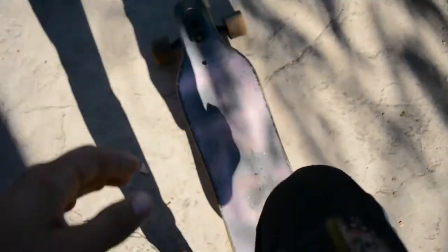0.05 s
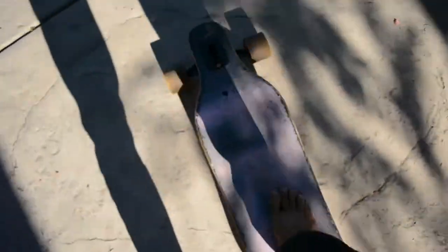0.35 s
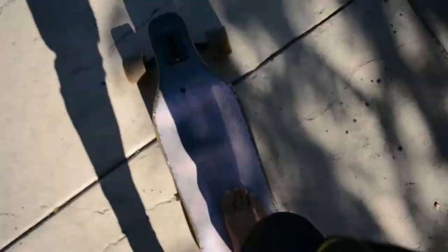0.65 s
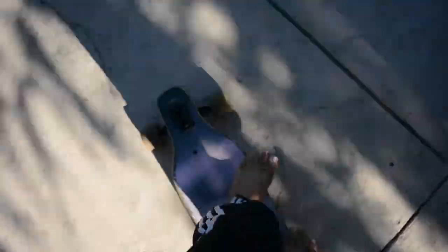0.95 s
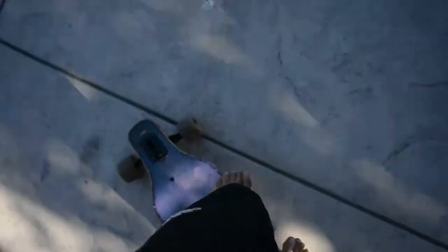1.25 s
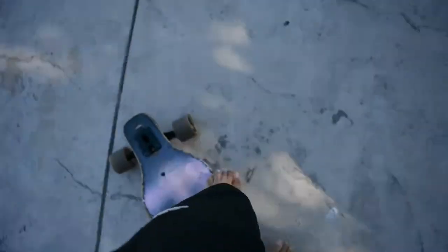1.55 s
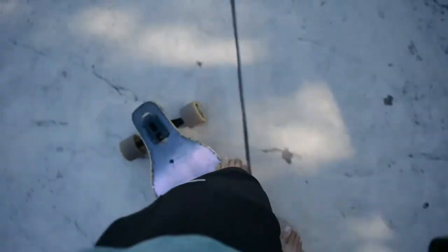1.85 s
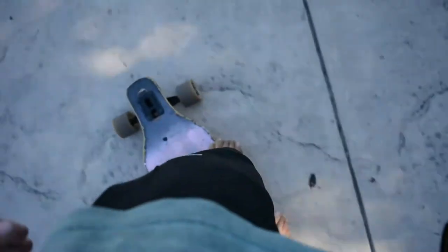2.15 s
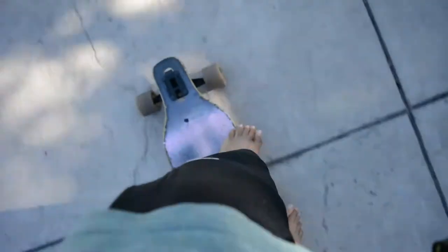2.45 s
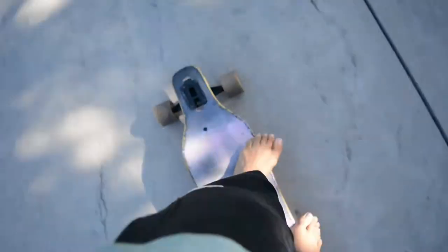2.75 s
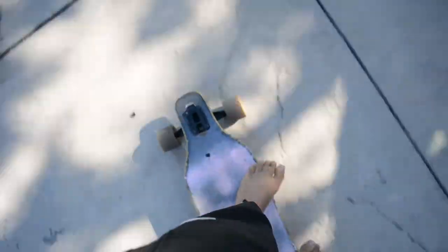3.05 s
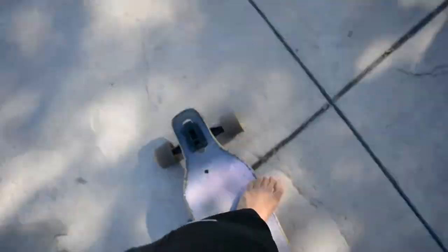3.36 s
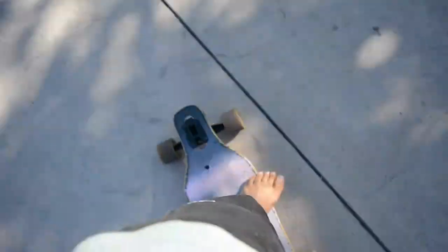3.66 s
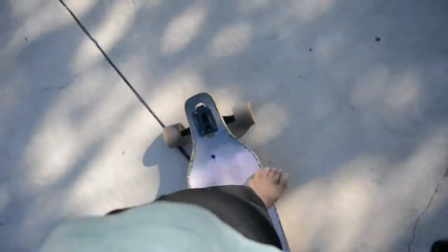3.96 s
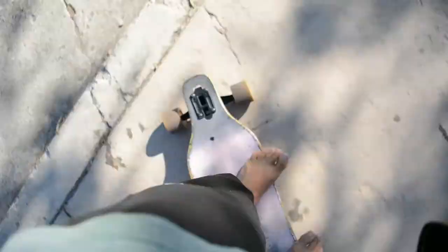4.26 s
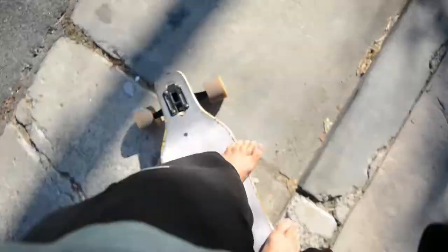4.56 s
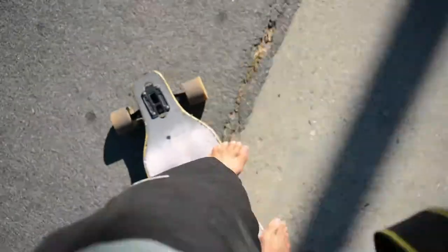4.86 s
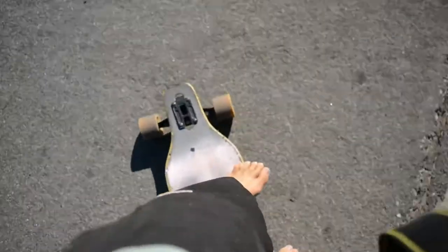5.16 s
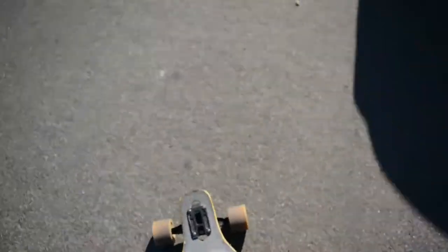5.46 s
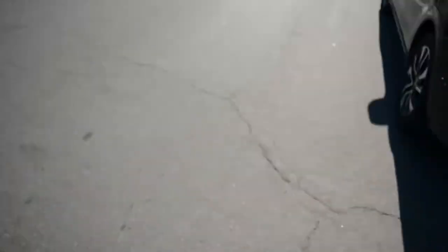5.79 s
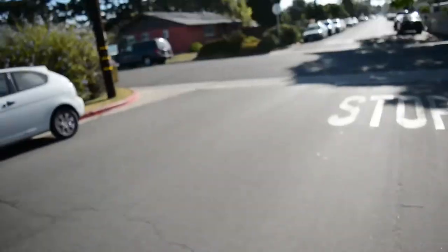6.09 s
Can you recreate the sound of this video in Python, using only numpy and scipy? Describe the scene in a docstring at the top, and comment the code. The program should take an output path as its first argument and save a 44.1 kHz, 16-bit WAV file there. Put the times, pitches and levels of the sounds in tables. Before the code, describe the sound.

A skateboard lands with a loud clack and rattle, then its wheels rumble over sidewalk cracks, clattering across a rough patch before fading.

```python
"""A loud wooden slam and clatter: a longboard is dropped on concrete, then ridden over sidewalk slabs,
across a broken gutter and onto asphalt. Impacts excite the deck's resonant modes, and the pavement's
texture drums it through the wheels. Joints knock, grit crackles and bearings sizzle, over a weak echo
and faint street air. The landing overloads a hand-held microphone; as it tilts away, the rolling fades."""
import sys
import numpy as np
from scipy import signal
from scipy.fft import rfft, irfft, next_fast_len
from scipy.io import wavfile
from scipy.ndimage import map_coordinates

SR = 44100
rng = np.random.default_rng(int(sys.argv[2]) if len(sys.argv) > 2 else 0)


def store_pcm(level_fs):
    """Save levels as 16-bit WAV."""
    pcm = np.round(np.clip(level_fs, -1, 1) * 32767).astype(np.int16)
    wavfile.write(sys.argv[1], SR, np.atleast_2d(pcm).T)


N = 274610
TAPS = 8192  # samples in one filter or impact
HZ = np.fft.rfftfreq(TAPS, 1 / SR)
AGE = np.arange(TAPS) / SR  # seconds since an impact


# modes of the unloaded board: pitch_hz, width_hz, level_db
FREE_MODES = [(315, 115, -4.5), (385, 54, -8.5), (565.3, 26.4, 4.5), (610, 42, -4), (680, 130, -8.5),
              (855, 24, -9), (1110, 80, -15), (1405, 99, -36), (1575, 340, -16), (1743, 104, -15),
              (2016, 40, -20), (2262, 100, -21), (2670, 300, -34)]
# the slam and its rebounds: start_s, blow_db, crack_db, contact_s
LANDING_HITS = [(.1055, 17, -9.5, 0.0012), (.171, -7, -26, 0.0095), (.2075, -2.5, -17.5, 0.00062),
                (.2425, -2.5, -18.5, 0.0045), (.256, -6, -27, 0.0022), (.2888, 6.5, -15.5, 0.002),
                (.307, -11, -20.5, 0.0024), (.333, -6.5, -32, 0.003), (.349, -33, -27, 0.0015),
                (.368, -13, -42, 0.0027)]
def landing():
    """Free vibration: with little weight on it, the board rings at each rebound."""
    out = np.zeros(N)
    for start_s, blow_db, crack_db, contact_s in LANDING_HITS:
        body = deck(FREE_MODES, scatter_db=1.3)
        add(out, start_s, amp(blow_db) * blow(body, contact_s, scrape=0.22, scrape_s=0.0032, low_hz=186))
        add(out, start_s, amp(crack_db) * crack(rise_s=0.0042, t60=0.14, tail_db=-2.5, tail_t60=0.22))
    return out


def deck(modes, scatter_db):
    """Modal superposition: damped resonances of random strength add in power to one gain curve."""
    gains = [amp(db + scatter_db * rng.normal()) * hz * width / (hz ** 2 - HZ ** 2 + 1j * HZ * width)
             for hz, width, db in modes]
    return np.sqrt(sum(np.abs(gain) ** 2 for gain in gains))


def blow(body, contact_s, scrape, scrape_s, low_hz):
    """Impact excitation: an impulse and a scrape ring the deck; soft wheels slow the onset."""
    force = rng.standard_normal(TAPS) * AGE * np.exp(-AGE / scrape_s)
    force *= scrape / np.linalg.norm(force)
    force[0] += 1
    ring = filtered(force, body) * onset(max(contact_s, 1e-4))
    return unit_peak(filtered(ring, low_cut(low_hz)))


def low_cut(cutoff_hz):
    """High-pass: thins the bass of the knocks and the drumming."""
    return HZ ** 2 / np.sqrt(HZ ** 4 + cutoff_hz ** 4)


# spectrum of a hard contact: frequency_hz, level_db
CRACK_SPECTRUM = [(100, -35), (900, 13), (1900, 5), (2700, 6), (3800, -2.5), (6500, -5.5), (8400, -1),
                  (10500, -16.5), (13500, -13), (16000, -15)]
def crack(rise_s, t60, tail_db, tail_t60):
    """Broadband transient: the contact crunches, and the trucks rattle on after it."""
    crunch = (burst(t60) + amp(tail_db) * burst(tail_t60)) * onset(rise_s)
    return unit_peak(filtered(crunch, colour(CRACK_SPECTRUM)))


# modes of the board under the rider's weight: pitch_hz, width_hz, level_db
LOADED_MODES = [(335, 87, -6), (477, 35, -4), (537.7, 45, 4), (595, 51, 3.5), (643, 48, 1.5),
                (693.3, 44, 1.5), (765, 31, -8.5), (1098, 136, -10), (1180, 220, -24.5), (1590, 140, -50),
                (2133, 150, -21.5), (2500, 230, -34.5)]
# wheels strike slab edges, at relative levels: start_s, blow_db, crack_db
JOINT_HITS = [(.483, -18, -37), (.492, -19, -32), (.883, -20.5, -57), (.98, -18.5, -30),
              (1.058, -13, -33.5), (1.081, -15, -35), (1.091, -10, -25), (1.377, -21.5, -36),
              (1.551, -23, -34.5), (1.572, -18.5, -32), (1.7, -24.5, -42), (1.912, -21, -32.5),
              (2.236, -21, -35), (2.41, -11, -38), (2.51, -17.5, -44), (2.712, -13.5, -40),
              (2.981, -19.5, -36), (3.079, -24, -52), (3.15, -21.5, -45), (3.184, -23.5, -55),
              (3.338, -19.5, -39), (3.363, -17, -38), (3.475, -23, -40), (3.664, -16, -47),
              (4.092, -19, -34), (4.285, -14.5, -41), (4.357, -21, -40), (4.43, -5.5, -21),
              (4.444, -11, -18), (4.451, -5.5, -27), (4.458, -2, -28), (4.472, -15, -29), (4.49, -6, -20.5),
              (4.511, -5, -19), (4.635, -21.5, -33), (4.696, -20, -31), (4.717, -11.5, -21.5),
              (4.744, -7, -33), (4.75, -12, -24), (4.761, -11, -34), (4.79, -12, -40), (4.833, -19, -27.5),
              (4.854, -20.5, -37), (4.913, -21, -30.5), (4.936, -16.5, -33.5), (4.949, -15, -44),
              (5.139, -19.5, -38), (5.221, -23, -55)]
def joints():
    """Contact stiffening: a harder knock is briefer, and jolts more of the rider's weight off the deck."""
    out = np.zeros(N)
    bounce_rise_s = 0.0079
    for start_s, blow_db, crack_db in JOINT_HITS:
        softness = amp(-0.35 * blow_db)
        free_share = min(amp(blow_db - 3), 1)
        loaded, free = deck(LOADED_MODES, scatter_db=2.5), deck(FREE_MODES, scatter_db=2.0)
        body = np.sqrt((1 - free_share) * loaded ** 2 + free_share * free ** 2)
        knock = blow(body, contact_s=0.0026 * softness, scrape=0.3, scrape_s=0.0034, low_hz=152)
        crunch = crack(rise_s=0.0017 * softness, t60=0.022, tail_db=-12.5, tail_t60=0.082)
        ripple_hz = np.interp(start_s, *np.transpose(RIPPLE_RATE))
        thump = wheel_bounce(ripple_hz, bounce_rise_s, t60=0.066)
        add(out, start_s, amp(blow_db + 1.5) * knock)
        add(out, start_s - 0.001, amp(crack_db + 6) * crunch)
        add(out, start_s - bounce_rise_s, amp(0.37 * blow_db - 26) * thump)
    return out


def wheel_bounce(pitch_hz, rise_s, t60):
    """Damped oscillator: a wheel thumps on its springy urethane."""
    swing = np.sin(2 * np.pi * (pitch_hz * AGE + rng.random()))
    return unit_peak(swing * onset(rise_s) * amp(-60 * AGE / t60))


# stones and steel fittings: start_s, peak_db, pitch_hz
SNAP_HITS = [(0.1031, -11, 4600), (0.1046, -4, 8500), (0.108, 4.5, 7760), (.156, -16, 1890),
             (0.171, -24, 2100), (0.209, -9.5, 2000), (.234, -15, 2880), (.313, -23, 1980),
             (.936, -26, 2230), (2.855, -29, 2200), (4.283, -25.5, 2440), (4.4271, -16.5, 2570),
             (4.444, -16.5, 2930), (4.456, -19, 1450), (4.495, -18, 7500), (4.509, -12, 7900),
             (4.723, -20, 1770), (4.786, -16, 6860), (4.79, -16.5, 10800), (4.821, -22, 2400),
             (4.842, -22, 3520), (5.064, -30, 3430), (5.3058, -28, 5030), (5.512, -26, 9770),
             (5.678, -31.5, 7510)]
def snaps(ticks_per_s=6.7, tick_hz=4630):
    """Small hard bodies ring high: stones and fittings snap, and sand ticks as a Poisson process."""
    out = np.zeros(N)
    for start_s, peak_db, pitch_hz in SNAP_HITS:
        add(out, start_s, amp(peak_db) * snap(pitch_hz))
    _, _, grit_db = contact_levels()
    for i in np.flatnonzero(rng.random(N) < ticks_per_s / SR):
        peak_db = grit_db[i] + 9 + rng.normal()
        octaves = 0.6 * rng.normal()
        add(out, i / SR, amp(peak_db) * snap(tick_hz * 2 ** octaves))
    return out


def snap(pitch_hz, q=3.0):
    """Heavily damped resonance: a brief noise burst clicks around one pitch."""
    resonance = 1 / np.sqrt(1 + (q * (HZ / pitch_hz - pitch_hz / (HZ + 1))) ** 2)
    return unit_peak(filtered(burst(0.0059) + amp(5.5) * burst(0.013), resonance))


def rolling():
    """Forced vibration: pavement texture drives deck and wheels; rough patches also crush more grit."""
    drum_db, rumble_db, grit_db = contact_levels()
    patches = wobble(60) + 0.4 * wobble(18)
    texture = bumps(per_s=1800, spread_db=7)
    body = deck(LOADED_MODES, scatter_db=0) * low_cut(cutoff_hz=170)
    drum = amp(drum_db + 1 + 1.7 * patches) * unit_rms(filtered(texture, body))
    grains = 0.23 * texture + rng.standard_normal(N) + 0.81 * bumps(per_s=340, spread_db=11)
    sizzle = amp(grit_db + 1.64 * patches) * (grit(grains) + amp(-10) * bearings())
    wheels = amp(rumble_db - 0.5 + 2.3 * patches) * rumble()
    return drum + wheels + sizzle


# relative levels of steady rolling: time_s, drum_db, rumble_db, grit_db
ROLL_LEVELS = [(0.4, -29, -41.5, -41.5), (0.68, -42.5, -43, -57), (0.9, -36.5, -50, -53.5),
               (1.08, -40.5, -39, -50.5), (1.28, -35, -44.5, -49), (1.52, -34.5, -40.5, -47.5),
               (2.36, -33, -37, -48), (2.8, -34, -41, -49), (3.06, -35, -47.5, -52),
               (3.32, -36, -39.5, -50), (3.55, -34.5, -44, -50), (3.92, -33.5, -47, -50),
               (4.2, -33.5, -47.5, -48), (4.5, -36, -33, -53), (4.67, -33, -36.5, -43),
               (4.94, -31, -39.5, -46.5), (6.06, -40.5, -51, -56.5), (6.23, -42.5, -57, -60.5)]
# brief swells from foot scuffs, landing clatter, shudder after joints and rough ground:
# start_s, length_s, extra_drum_db, extra_rumble_db, extra_grit_db
SWELLS = [(0.007, 0.016, 4, 7, 5.5), (0.152, .11, 19, 16, -3), (0.312, 0.046, 23, 19, 10),
          (0.482, 0.052, 4, -5, 1.5), (0.612, .06, 5.5, 5.5, 9.5), (0.971, 0.058, 1.5, 5, 11),
          (1.075, 0.015, 10, 6, 10), (2.393, 0.0094, 0.5, 6, 3.5), (2.69, 0.029, 2, 10, 2.5),
          (2.885, 0.25, 0.5, 8.5, 2), (4.29, .12, 1.5, 4, 4), (4.438, 0.082, 12.5, 0.5, 9),
          (4.712, 0.043, 15, 3, 7), (5.088, 0.077, 1.5, 6, 0.5)]
def contact_levels(settled_s=0.48, settling_s=0.025, ramp_s=0.033):
    """Amplitude envelopes in dB: drumming, rumble and grit rise as the wheels settle, with brief swells."""
    t = np.arange(N) / SR
    unsettled = np.clip((settled_s - t) / settling_s, 0, 1)
    levels_db = np.array(curves(ROLL_LEVELS)) - 12.5 * unsettled
    for start_s, length_s, *extra_db in SWELLS:
        inside = 1 + np.minimum(t - start_s, start_s + length_s - t) / ramp_s
        levels_db += np.outer(extra_db, np.clip(inside, 0, 1))
    return levels_db


# rate at which the wheels meet the pavement's ripples: time_s, rate_hz
RIPPLE_RATE = [(.65, 117.9), (1.1, 170), (1.5, 100), (2.15, 98.9), (2.41, 144.5), (2.72, 141.9),
               (3.2, 114.4), (3.45, 199), (4.28, 193.5), (4.5, 147.7), (5.5, 128), (6.23, 144)]
# spectrum of the bouncing wheels: frequency_hz, level_db
RUMBLE_SPECTRUM = [(25, -22), (50, -22), (70, -20), (90, -1.5), (135, -4.5), (190, -3), (260, -11),
                   (500, -18), (1500, -100)]
def rumble():
    """Base excitation: random bumps make the wheels rumble, and ripples add a loose hum."""
    ripple_hz, = curves(RIPPLE_RATE)
    phase = 2 * np.pi * np.cumsum(ripple_hz) / SR
    hum = unit_rms(wobble(22) * np.sin(phase) + wobble(22) * np.cos(phase))
    jolts = unit_rms(filtered(bumps(per_s=990, spread_db=5.5), colour(RUMBLE_SPECTRUM)))
    return unit_rms(jolts + amp(-2.5) * hum)


# spectrum of crushed grit: frequency_hz, level_db
GRIT_SPECTRUM = [(600, -40), (1200, 14.5), (1800, 8), (2700, 8), (3400, 1.5), (4500, -1.5), (5600, -3.5),
                 (7000, -6), (8400, 0), (9800, -11), (11500, -12), (13700, -5.5), (15500, -21)]
def grit(grains):
    """Shot noise: many tiny contacts merge into a bright crackle."""
    return unit_rms(filtered(grains, colour(GRIT_SPECTRUM)))


# resonances of the steel balls and races: pitch_hz, width_hz, level_db
BEARING_MODES = [(5600, 2000, 3), (8170, 1040, -0.5), (13400, 1300, -14)]
def bearings():
    """Amplitude modulation: each resonance chirps in its own short fits, and all swell together."""
    chirps = np.zeros(N)
    for pitch_hz, width_hz, level_db in BEARING_MODES:
        fits = amp(15 * np.tanh(0.54 * wobble(80)))
        band = 1 / (1 + (2 * (HZ - pitch_hz) / width_hz) ** 2)
        chirps += amp(level_db) * unit_rms(fits * filtered(rng.standard_normal(N), band))
    swell_db = 2.5 * np.tanh(wobble(6))
    return unit_rms(chirps * amp(swell_db))


def walls(x, t60, rise_s, cutoff_hz=6000):
    """Diffuse reflection: house fronts scatter a dull echo."""
    t = np.arange(SR // 2) / SR
    reflections = rng.standard_normal(len(t)) * amp(-60 * t / t60) * np.clip(t / rise_s, 0, 1)
    tail = filtered(reflections, 1 / np.hypot(1, HZ / cutoff_hz))
    return signal.fftconvolve(x, tail / np.linalg.norm(tail))[:N]


# spectrum of the open air: frequency_hz, level_db
STREET_SPECTRUM = [(20, 2), (60, -11.5), (200, -1), (1000, -14.5), (4000, -33.5), (15000, -35.5)]
def street():
    """Ambient noise: a faint, steady, low wash."""
    return amp(-53) * unit_rms(filtered(rng.standard_normal(N), colour(STREET_SPECTRUM)))


def amp(db):
    """Decibels to gain."""
    return 10 ** (np.asarray(db) / 20)


def unit_rms(x):
    """Scale to rms 1."""
    return x / np.sqrt(np.mean(x ** 2) + 1e-20)


def unit_peak(x):
    """Scale to peak 1."""
    return x / np.max(np.abs(x))


def colour(points):
    """Spectral envelope: gain interpolated on a log frequency axis."""
    hz, db = np.transpose(points)
    return amp(np.interp(np.log(HZ + 1), np.log(hz), db))


def filtered(x, gain):
    """Minimum-phase filtering: a causal response with this gain per frequency."""
    cepstrum = irfft(np.log(np.maximum(gain, 1e-6)))
    cepstrum[1:TAPS // 2] *= 2
    cepstrum[TAPS // 2 + 1:] = 0
    response = irfft(np.exp(rfft(cepstrum)))
    return signal.fftconvolve(x, response)[:len(x)]


def curves(rows):
    """Linear interpolation: one value per sample for each column after the time."""
    times, *columns = np.transpose(rows)
    return [np.interp(np.arange(N) / SR, times, column) for column in columns]


def wobble(per_s):
    """Smooth noise: a spline through evenly spaced random knots."""
    knots = rng.standard_normal(int(N * per_s / SR) + 4)
    return map_coordinates(knots, [np.arange(N) * per_s / SR])


def bumps(per_s, spread_db):
    """Poisson impulses: tiny contacts of random size and sign."""
    hit = rng.random(N) < per_s / SR
    return unit_rms(hit * amp(spread_db * rng.random(N)) * rng.choice([-1, 1], N))


def burst(t60):
    """Exponential decay: noise falls 60 dB in t60 seconds."""
    return rng.standard_normal(TAPS) * amp(-60 * AGE / t60)


def onset(rise_s):
    """First-order rise from 0 towards 1."""
    return 1 - np.exp(-AGE / rise_s)


def add(track, start_s, sound):
    """Mix a sound into the track."""
    part = track[max(round(start_s * SR), 0):][:len(sound)]
    part += sound[:len(part)]


def scene():
    """Superposition: impacts, their echo, rolling and street air sum to one channel."""
    hits = landing() + joints() + snaps()
    echo = amp(-20) * walls(hits, t60=0.47, rise_s=0.0095)
    return (hits + echo + rolling() + street())[None]


def record(dry):
    """Saturation and band limiting: the microphone flattens peaks at full scale; the top treble is cut."""
    top_hz = 15750
    saturated = dry / (1 + np.abs(dry) ** 8) ** (1 / 8)
    size = next_fast_len(N + TAPS)
    passband = np.fft.rfftfreq(size, 1 / SR) < top_hz
    return irfft(rfft(saturated, size) * passband, size)[..., :N]


dry = scene()
out = record(dry)
store_pcm(out)
```